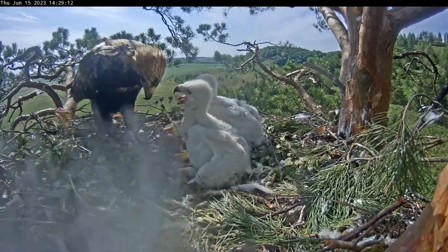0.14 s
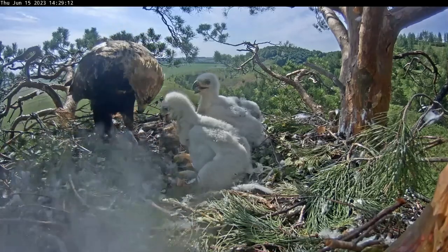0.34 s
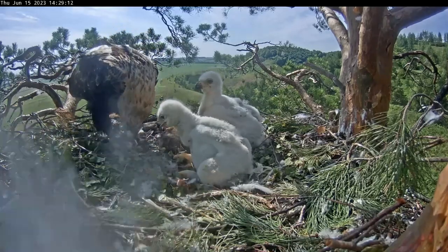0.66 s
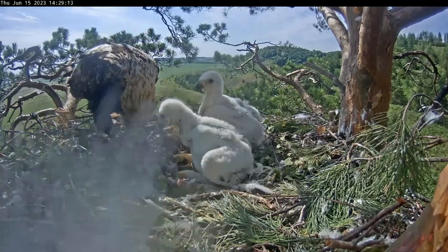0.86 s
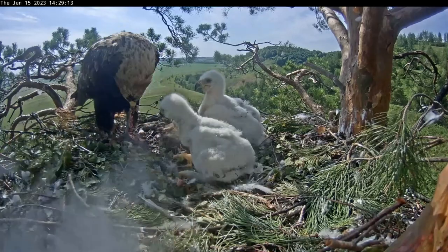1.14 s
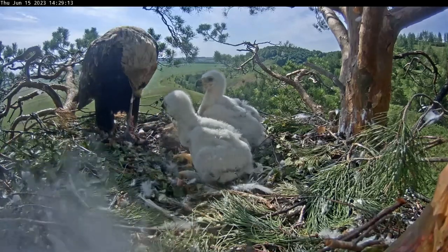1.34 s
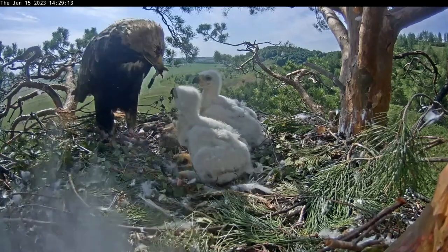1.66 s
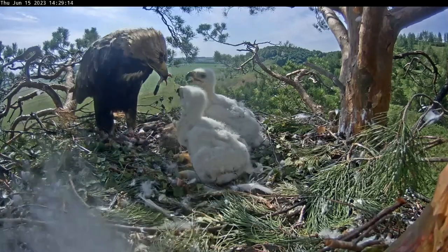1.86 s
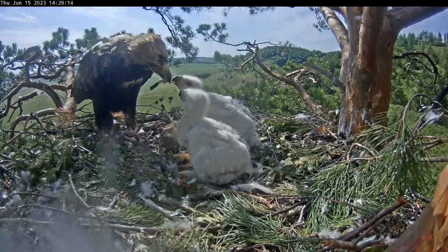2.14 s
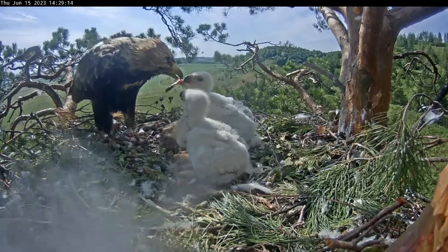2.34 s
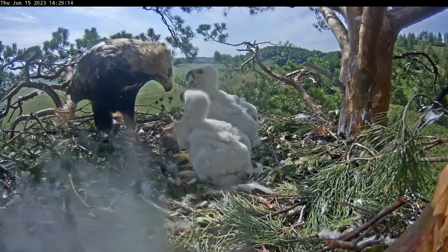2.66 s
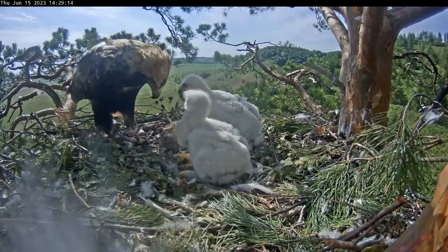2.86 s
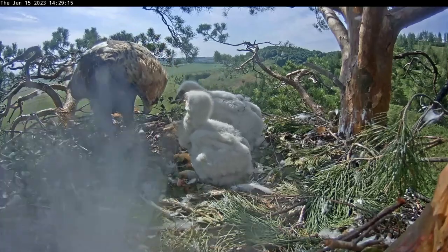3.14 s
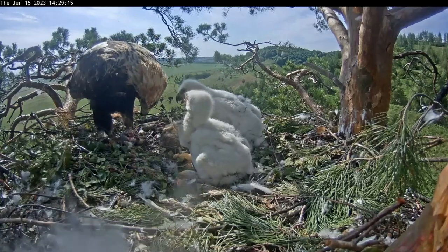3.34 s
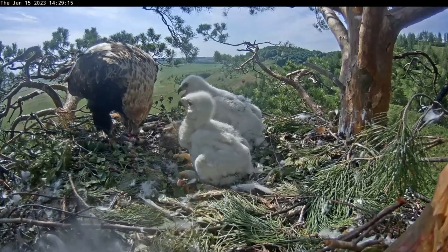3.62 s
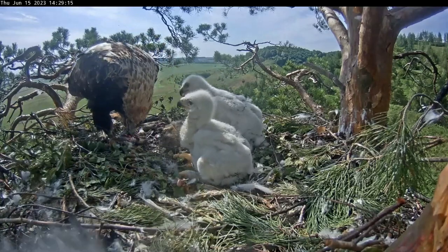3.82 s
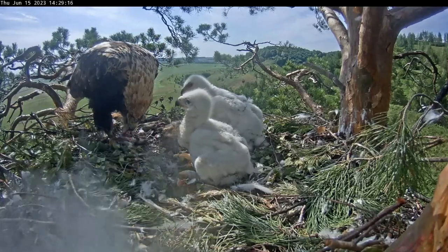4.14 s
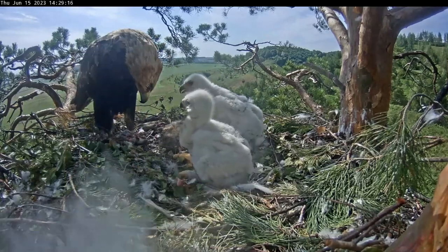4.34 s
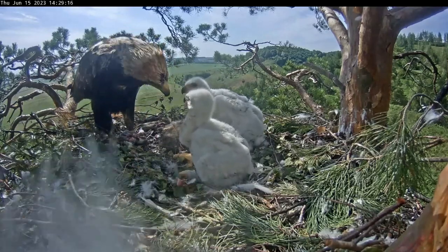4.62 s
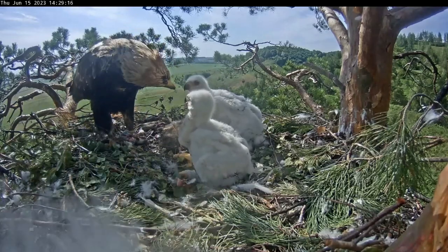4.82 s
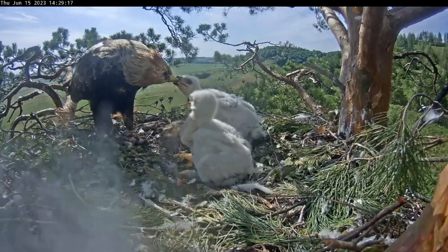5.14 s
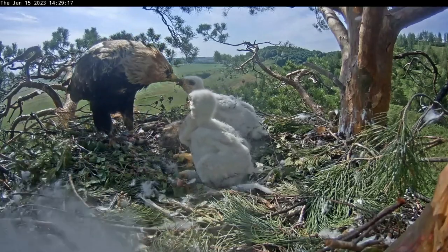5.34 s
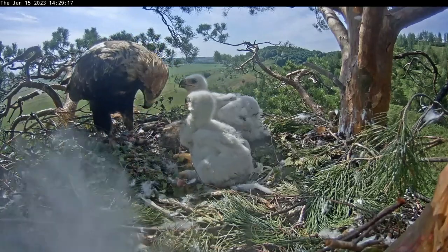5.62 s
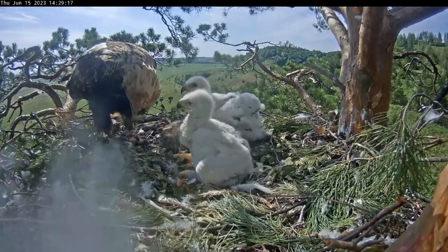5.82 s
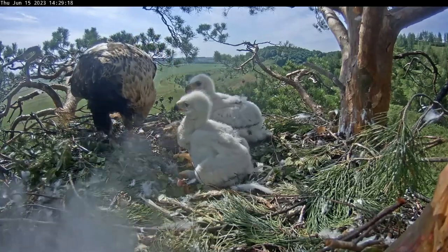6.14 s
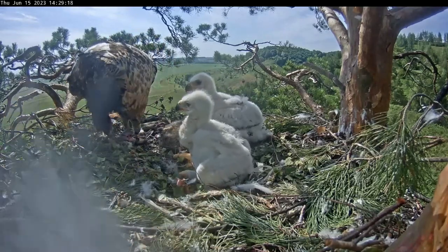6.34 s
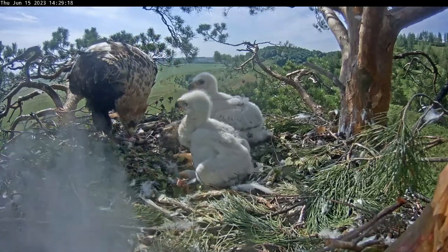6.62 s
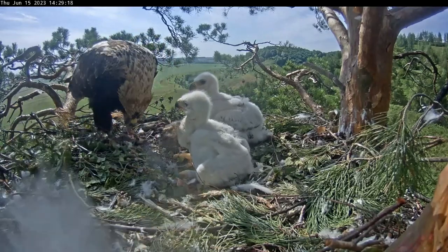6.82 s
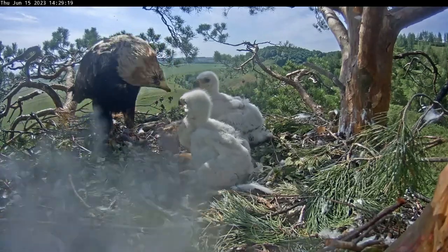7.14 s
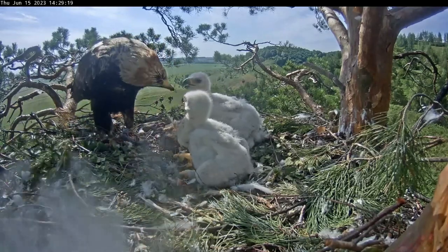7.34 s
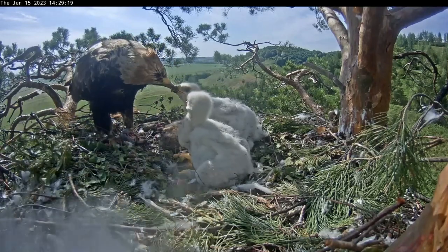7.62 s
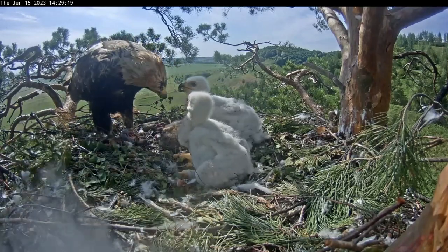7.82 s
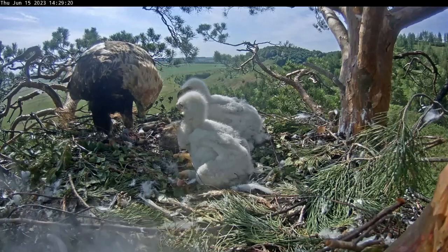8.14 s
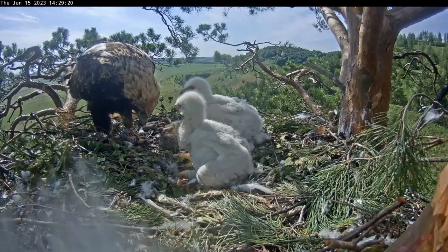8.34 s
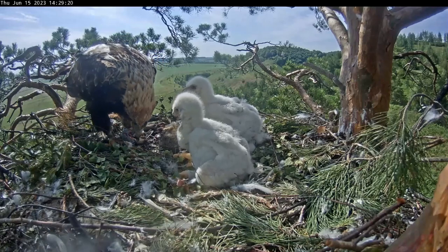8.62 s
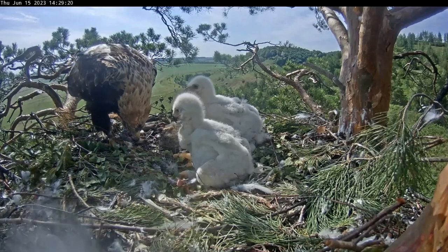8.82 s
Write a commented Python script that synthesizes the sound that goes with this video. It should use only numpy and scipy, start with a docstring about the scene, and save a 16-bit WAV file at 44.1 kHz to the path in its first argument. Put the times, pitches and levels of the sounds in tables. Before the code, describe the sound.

Thin, sliding begging whistles and quiet peeps from eagle chicks, with brief adult yelps, soft nest thuds and a steady rush of wind.

```python
"""Feeding time in an eagle's nest

Two downy chicks beg with thin, sliding whistles, once in a loud run, and peep quietly in between.
The parent gives a few short yelps, each a stack of overtones shaped by its throat.
The treetop nest of sticks thuds and rustles under the birds' weight.
A songbird sings far off, over a steady low rush of wind and hiss."""
import sys
import numpy as np
from scipy import signal
from scipy.fft import rfft, irfft, next_fast_len
from scipy.io import wavfile
from scipy.ndimage import uniform_filter1d, map_coordinates

SR = 44100
rng = np.random.default_rng(int(sys.argv[2]) if len(sys.argv) > 2 else 0)


def log_audio(samples):
    """Write samples as a 16-bit WAV file to the path given in sys.argv[1]."""
    # one column per channel
    frames = np.atleast_2d(samples).T
    # limit to full scale, then quantise
    limited = np.clip(frames, -1, 1)
    pcm = np.round(limited * 32767).astype(np.int16)
    wavfile.write(sys.argv[1], SR, pcm)


N = 395577

# Three whistle shapes: climb and tumble, dip and recover, arch over and fall away.
# position in the whistle/0-1, f/Hz, effort/dB
CLIMB_SHAPE = [(0, 4530, -6), (.14, 4940, -1), (.48, 5320, -2), (.67, 6540, -10), (.84, 4730, 1),
               (1, 4220, -9)]
DIP_SHAPE = [(0, 4820, -8), (.14, 4570, -2), (.27, 4210, -4.5), (.41, 3720, -6), (.53, 3520, -8.5),
             (.69, 3790, -4.5), (.86, 4156, -6), (1, 4120, -16)]
ARCH_SHAPE = [(0, 2530, -8), (.17, 3610, -2.5), (.36, 4185, -1.5), (.58, 4046, -5.5), (.75, 3840, -0.5),
              (.86, 3390, 1), (1, 2460, -1)]
# The whistles of each shape: t/s, length/s, pitch factor at start, pitch factor at end, level/dB,
# growth in level/dB, position of the push/0-1, push/dB, roughness/0-1
CLIMB_CALLS = [(1.025, .122, 1, 0.97, -17, 0.5, 0.73, 3, 0.5),
               (1.214, .122, 1.005, 0.97, -15, 5, 0.81, 3, .45)]
DIP_CALLS = [(1.402, 0.121, 1, 1.012, -8, 2.5, .83, 4, 0.4),
             (1.591, 0.13, .985, 1.005, -7.5, 2, .69, 5.5, .18),
             (1.794, .126, 1.015, .98, -6.5, -3, .69, 6.5, 0.3),
             (6.862, 0.083, 1.17, 1.09, -16, 1, .75, 6.5, 0.7)]
ARCH_CALLS = [(1.993, .129, 1.003, 1, -9.5, -1, 0.26, 1.5, 0.2),
              (2.196, .122, 0.994, 0.98, -7.5, -6, 0.49, -1.5, 0.3)]
# How well each pitch carries to the listener: f/Hz, gain/dB
CARRYING = [(2500, -9.5), (3550, -14.5), (3790, 0), (3900, -2), (3990, -8), (4170, 2.5), (4320, 0),
            (4460, -4.5), (4590, -2.5), (4730, -3.5), (5000, -4), (6500, -7)]

def begging(flutter_db=1.4, push_width=.09):
    """The chicks' long whistles swoop, each with one push, and swell at the pitches that carry best."""
    out = np.zeros(N)
    for shape, calls in [(CLIMB_SHAPE, CLIMB_CALLS), (DIP_SHAPE, DIP_CALLS), (ARCH_SHAPE, ARCH_CALLS)]:
        positions, hz, effort_db = np.transpose(shape)
        for s, length, first, last, db, growth_db, push_at, push_db, rough in calls:
            t = times(length)
            progress = t / length
            swoop = uniform_filter1d(np.interp(progress, positions, hz), size=300, mode="nearest")
            pitch = (first + (last - first) * progress) * swoop
            push = push_db * np.exp(-((progress - push_at) / push_width) ** 2)
            effort = np.interp(progress, positions, effort_db) + growth_db * (progress - .5) + push
            gain = amp(db + effort + along(CARRYING, pitch))
            add(out, s, gain * whistle(pitch, rough, flutter_db) * fade(t, rise=.002, fall=.0058))
    return out


def whistle(hz, rough, flutter_db, rasp_rate=800, waver_hz=20):
    """A bird's voice box makes one nearly pure, fluttering tone; roughness turns it raspy."""
    size = len(hz)
    share = np.clip(rough, 0, 1)
    rasp = (wobble(rasp_rate, size) + 1j * wobble(rasp_rate, size)) / np.sqrt(2)
    phase = 2 * np.pi * np.cumsum(hz + waver_hz * wobble(150, size)) / SR
    tone = (np.sqrt(1 - share ** 2) + share * rasp) * np.exp(1j * phase)
    return amp(flutter_db * wobble(170, size)) * tone.real


# The parent's yelps: t/s, time held/s, f/Hz, level/dB, length of the lower tail/s
PARENT_YELPS = [(.164, 0.017, 653, -18, 0.012), (0.659, 0.036, 678, -13.5, .036),
                (1.252, 0.037, 681.6, -13, 0.014), (3.685, .02, 682, -24.5, .016),
                (8.205, .018, 679, -26, .014)]
# How its throat colours the overtones: f/Hz, gain/dB
THROAT_COLOUR = [(550, -8.5), (700, -15), (1150, -9.5), (1370, -9), (1750, -11), (2050, -1.5), (2400, -16),
                 (2750, -19), (4000, -28)]

def yelping(drop=.14, tail_db=-5, swell_db=4, jitter=.008, shimmer_db=1.1):
    """The parent's slightly unsteady note swells, then breaks to a lower, duller one that sags away."""
    out = np.zeros(N)
    for s, held, hz, db, tail in PARENT_YELPS:
        t = times(held + tail)
        broken = .5 + .5 * np.tanh((t - held) / .0025)  # goes from 0 to 1 as the voice breaks
        arch = 1 - 22 * (t - .6 * held) ** 2
        pitch = hz * arch * (1 - drop * broken) * (1 + jitter * wobble(440, len(t)))
        phase = 2 * np.pi * np.cumsum(pitch) / SR
        voice = np.zeros(len(t))
        for k in range(1, 6):
            dulling_db = tail_db * broken * (k - 1) / 2
            voice += amp(along(THROAT_COLOUR, k * pitch) + dulling_db) * np.sin(k * phase)
        effort = swell_db * np.minimum(t / held - .5, 0) + shimmer_db * wobble(220, len(t))
        add(out, s, amp(db + effort) * voice * fade(t, rise=.006, fall=.0081))
    return out


# Flicks, one quick fall: t/s, level/dB
FLICK_PEEPS = [(.903, -28), (2.415, -27.5), (2.808, -26.5), (3.402, -25), (3.555, -27.5), (4.09, -25.5),
               (4.424, -26.5), (5.014, -27), (5.34, -30)]
# Slurs, a fall that settles and dies away: t/s, length/s, final f/Hz, level/dB
SLUR_PEEPS = [(0.57, .045, 3560, -22), (1.179, .042, 3590, -23.5), (2.481, 0.054, 3400, -26),
              (2.974, 0.033, 3560, -21), (3.094, 0.085, 3500, -23.5), (3.728, 0.054, 3610, -24),
              (4.045, .03, 4720, -25), (4.383, 0.025, 4700, -28), (4.703, 0.054, 3616, -22)]
# Lifts, one short rise: t/s, middle f/Hz, level/dB
LIFT_PEEPS = [(2.668, 3820, -23.5), (3.003, 4020, -26), (3.194, 4110, -25), (3.385, 4160, -30),
              (3.584, 4000, -29), (4.527, 3990, -29.5), (4.82, 4010, -26), (5.105, 3860, -29)]
# Squeaks, clear or raspy, mostly sagging: t/s, length/s, middle f/Hz, sag/Hz, level/dB, roughness
SQUEAK_PEEPS = [(2.152, .03, 4120, 149, -17, 0.15), (2.311, .02, 4130, 450, -19.5, 0.3),
                (2.575, 0.023, 4010, -1, -29, .6), (2.648, 0.024, 4250, 0, -22.5, 1),
                (2.844, .034, 4040, 219, -23.5, 0.1), (2.952, 0.021, 4250, 0, -24, 0.5),
                (3.286, .08, 4110, 300, -27.5, 1.1), (4.152, 0.048, 3930, 300, -25, 0.5),
                (4.491, 0.028, 3970, 230, -26, 0.25), (6.236, .044, 4270, 150, -24, 1),
                (6.443, .027, 4310, 750, -21, 0.7), (6.599, 0.018, 4150, -250, -19, 0.4),
                (6.999, .006, 4100, 150, -16, 0), (7.314, .039, 4040, 60, -27.5, 1),
                (7.433, .054, 3530, 0, -27, 1), (7.556, .044, 4230, 400, -22.5, .6),
                (7.951, 0.034, 4060, -250, -23, .75), (8.141, .022, 4060, 188, -30, .6)]
# Mews, a low note that scoops up, holds and drops: t/s, length/s, f/Hz, final drop/Hz, level/dB
MEW_PEEPS = [(2.396, 0.115, 3000, 120, -25), (2.548, 0.023, 3050, 1200, -25),
             (2.99, 0.12, 2660, 750, -27.5), (3.65, .046, 2650, 810, -28.5), (4.285, 0.047, 2660, 666, -31),
             (4.92, 0.046, 2550, 450, -29), (5.532, 0.037, 2520, 700, -31), (7.008, .03, 3350, 1000, -29),
             (8.16, .04, 2500, 700, -35)]

def peeping(flick_s=.025, lift_s=.034, lift_hz_per_s=14000, slur_fade_db_per_s=100):
    """Between pieces of food the birds give five kinds of quiet peep, each bending its pitch its way."""
    out = np.zeros(N)
    for s, db in FLICK_PEEPS:
        add(out, s, peep(flick_s, db, lambda t: np.interp(t, [0, flick_s], [5100, 3320])))
    for s, length, hz, db in SLUR_PEEPS:
        note = peep(length, db, lambda t: hz + (5600 - hz) * np.exp(-t / .0072))
        add(out, s, note * amp(-slur_fade_db_per_s * times(length)))
    for s, hz, db in LIFT_PEEPS:
        add(out, s, peep(lift_s, db, lambda t: hz + lift_hz_per_s * (t - lift_s / 2)))
    for s, length, hz, sag_hz, db, rough in SQUEAK_PEEPS:
        add(out, s, peep(length, db, lambda t: hz - sag_hz * (t / length - .5), rough))
    for s, length, hz, drop_hz, db in MEW_PEEPS:
        scoop = lambda t: 239 * np.exp(-t / .011)
        drop = lambda t: drop_hz * np.clip(1 - (length - t) / .026, 0, 1) ** 2
        add(out, s, peep(length, db, lambda t: hz - scoop(t) - drop(t)))
    return out


def peep(length, db, pitch, rough=.38, longest_fade_s=.004):
    """One short whistle that fades in and out; pitch(t) gives its Hz at t seconds from its start."""
    t = times(length)
    ramp = min(.31 * length, longest_fade_s)
    return amp(db) * fade(t, ramp, ramp) * whistle(pitch(t), rough, flutter_db=2)


# How loud the faintest twitter is as time passes: t/s, level/dB
TWITTER_LEVELS = [(2.35, -32), (3.3, -32), (3.9, -37), (5.6, -41.5), (6.4, -33), (7.2, -34), (8.2, -36)]

def twittering(count=44, length=.04, middle_hz=3930, spread_hz=620, slide_hz_per_s=9000):
    """Very faint, raspy peeps slide up or down at random moments, thickest just after the loud run."""
    out = np.zeros(N)
    moments, levels = np.transpose(TWITTER_LEVELS)
    for when, height, tilt in rng.random((count, 3)):
        s = moments[0] + when ** 2 * (moments[-1] - moments[0])
        hz = middle_hz + spread_hz * (2 * height - 1)
        slide = slide_hz_per_s * (2 * tilt - 1)
        db = np.interp(s, moments, levels)
        add(out, s, peep(length, db, lambda t: hz + slide * (t - length / 2), rough=.95))
    return out


# Shoves on the nest: t/s, level/dB
NEST_SHOVES = [(.39, -19.5), (1.689, -12.5), (1.697, -11), (1.7127, -12), (1.724, -15.5), (1.7466, -22),
               (1.9, -14.5), (7.14, -11)]
# The notes at which the stick platform rings: f/Hz, level/dB, time to fade by 60 dB/s
NEST_NOTES = [(259, 0, 0.06), (300, -4, 0.12), (354, -4.5, 0.081), (658, -12.5, .06), (1050, -24, 0.037)]

def thudding(rise_s=.0023):
    """Shifting weight makes the nest ring with low notes that die quickly."""
    out, t = np.zeros(N), times(.2)
    for s, db in NEST_SHOVES:
        vary_db = rng.normal(0, 1, len(NEST_NOTES))
        ring = sum(amp(level + vary - 60 * t / t60) * np.sin(2 * np.pi * hz * t)
                   for (hz, level, t60), vary in zip(NEST_NOTES, vary_db))
        add(out, s, amp(db) * ring * (1 - np.exp(-t / rise_s)))
    return out


# Twigs shifting underfoot: t/s, length/s, level/dB
TWIG_RUSTLES = [(1.69, .04, -32), (1.825, .05, -30), (1.9, .035, -31.5)]
# The tone colour of their snaps: f/Hz, relative level/dB
TWIG_COLOUR = [(300, -19), (600, -1.5), (1200, -0.5), (2200, -3), (5000, -13.5), (7500, -27.5)]

def rustling(count=40):
    """Twigs crackle briefly under the birds' feet, each time in a clump of tiny snaps."""
    out = np.zeros(N)
    for s, length, db in TWIG_RUSTLES:
        size = int(length * SR)
        places = (size * rng.random(count)).astype(int)
        snaps = np.bincount(places, rng.standard_normal(count), size)
        add(out, s, amp(db) * unit(snaps))
    return coloured(out, TWIG_COLOUR) * np.std(out)


# The far songbird's notes: t/s, length/s, middle f/Hz, sag/Hz, relative level/dB
SONG_NOTES = [(.69, .025, 6480, 302, -33), (.81, 0.028, 6550, 200, -33), (.858, 0.02, 5080, 200, -28),
              (.935, .025, 6470, 100, -31), (.972, 0.025, 3980, 50, -28), (1.355, 0.038, 3670, 252, -25.5),
              (2.062, 0.015, 5080, 499, -30), (2.11, .025, 5130, 600, -23), (2.33, 0.027, 5370, 600, -33),
              (2.44, .025, 4950, 98, -30), (2.712, .08, 5060, 60, -31), (6.408, .035, 4630, 700, -27),
              (6.532, .035, 3436, 100, -28.5), (6.56, 0.022, 2930, 49, -30), (6.68, 0.024, 3380, 199, -26),
              (6.703, .035, 2900, 118, -27), (6.739, 0.034, 2546, 1, -28)]

def singing(direct_db=-6):
    """A songbird far off: its sliding notes arrive mostly as echoes from the trees."""
    out = np.zeros(N)
    for s, length, hz, sag_hz, db in SONG_NOTES:
        add(out, s, peep(length, db, lambda t: hz - sag_hz * (t / length - .5), rough=.7))
    return amp(direct_db) * out + scatter(out, rise=.004, t60=.12)


# The tone colours of the low rush and of the hiss: f/Hz, relative level/dB
RUMBLE_COLOUR = [(25, -49.5), (48, -23.5), (70, -8), (102, 1.5), (135, -3.5), (180, -7), (245, -1.5),
                 (320, -7), (400, -12), (520, -21), (900, -59.5)]
HISS_COLOUR = [(200, -16), (500, -0.5), (1000, 1.5), (1800, 0), (3000, -2), (4500, -3.5), (6000, -5.5),
               (7000, -9.5), (7400, -14), (7700, -25.5), (7900, -49.5)]

def wind(rumble_db=-24, hiss_db=-27.5, waver_db=.29):
    """A low rush round the tree and an even hiss above it, both barely wavering."""
    rumble = amp(rumble_db + waver_db * wobble(5, N)) * coloured(rng.standard_normal(N), RUMBLE_COLOUR)
    hiss = amp(hiss_db + waver_db * wobble(4, N)) * coloured(rng.standard_normal(N), HISS_COLOUR)
    return rumble + hiss


def branches(x, near_db, far_db=-13, ring_hz=4100, width_hz=300, broad_db=-11):
    """Echoes off nearby boughs smear the pitch; a weak tail follows, strongest around ring_hz."""
    near = amp(near_db) * scatter(x, rise=.004, t60=.11)
    far = amp(far_db) * scatter(x, rise=.022, t60=.38)
    colour = lambda hz: amp(broad_db) + 1 / (1 + ((hz - ring_hz) / width_hz) ** 2)
    return x + near + filtered(far, colour)


def scatter(x, rise, t60):
    """A dense echo about as strong as x: it builds for rise seconds and loses 60 dB in t60 seconds."""
    t = times(1 / 3)
    tail = rng.standard_normal(len(t)) * amp(-60 * t / t60) * np.clip(t / rise, 0, 1) ** 2
    return signal.fftconvolve(x, tail / np.linalg.norm(tail))[:N]


def times(length):
    """The time of each sample in a sound of this many seconds."""
    return np.arange(int(length * SR)) / SR


def amp(db):
    """Turn decibels into a gain to multiply by."""
    return 10 ** (np.asarray(db) / 20)


def unit(x):
    """Scale x to an average strength (rms) of 1."""
    return x / np.sqrt(np.mean(x ** 2) + 1e-20)


def along(points, hz):
    """Read between (Hz, value) points on a musical (log) pitch scale."""
    f, value = np.transpose(points)
    return np.interp(np.log(hz + 1), np.log(f + 1), value)


def wobble(rate, size):
    """A smooth curve through rate random points a second."""
    points = rng.standard_normal(int(size * rate / SR) + 4)
    return map_coordinates(points, [np.arange(size) * rate / SR])


def filtered(x, response):
    """Turn each frequency in x up or down by the gain response(hz)."""
    size = next_fast_len(N + SR // 2)
    return irfft(rfft(x, size) * response(np.fft.rfftfreq(size, 1 / SR)), size)[..., :N]


def coloured(x, colour):
    """Give x a tone colour from (Hz, dB) points, at an average strength of 1."""
    return unit(filtered(x, lambda hz: amp(along(colour, hz))))


def add(track, s, sound):
    """Mix a sound into the track, starting at s seconds."""
    part = track[max(round(s * SR), 0):][:len(sound)]
    part += sound[:len(part)]


def fade(t, rise, fall):
    """A rounded fade in over rise seconds and out over fall seconds."""
    fade_in = np.sin(np.pi / 2 * np.clip(t / rise, 0, 1))
    fade_out = np.sin(np.pi / 2 * np.clip((t[-1] - t) / fall, 0, 1))
    return fade_in * fade_out


def scene(peeps_db=-.65, song_db=-1.5):
    """Both channels get the same mix; the quiet peeps carry more echo than the loud calls."""
    loud = branches(begging() + yelping(), near_db=-14)
    quiet = amp(peeps_db) * branches(peeping() + twittering(), near_db=-7.5)
    mono = loud + quiet + amp(song_db) * singing() + thudding() + rustling() + wind()
    return np.array([mono, mono])


def record(dry, top_hz=7900):
    """Cut away all the treble above top_hz."""
    return filtered(dry, lambda hz: hz < top_hz)


dry = scene()
out = record(dry)
log_audio(out)
```